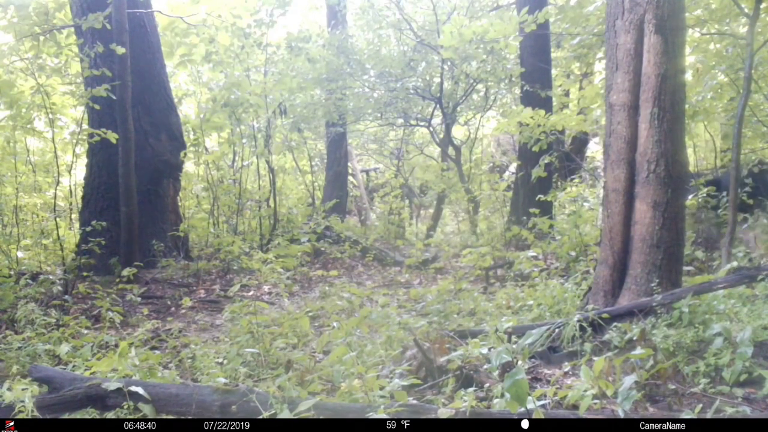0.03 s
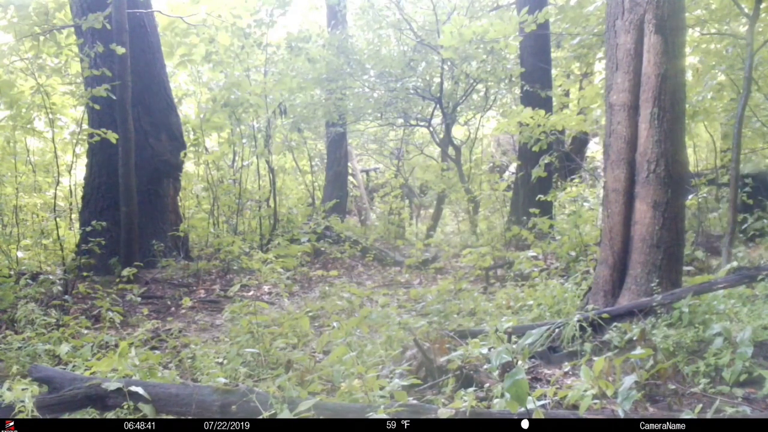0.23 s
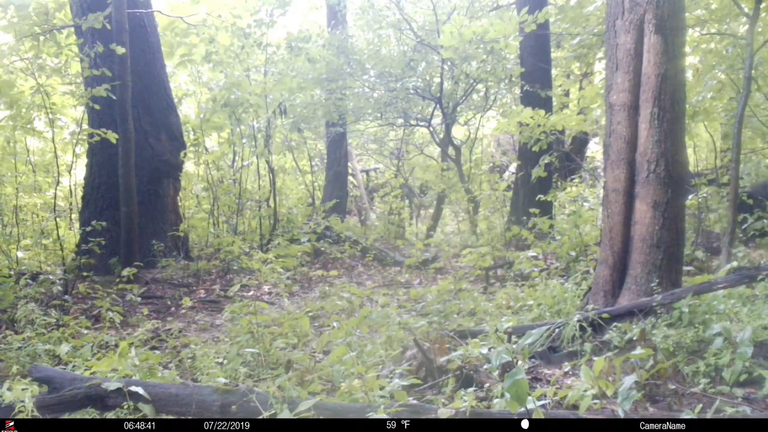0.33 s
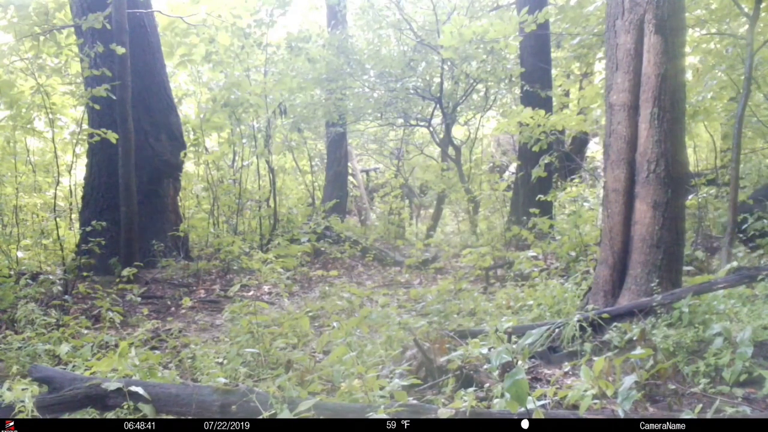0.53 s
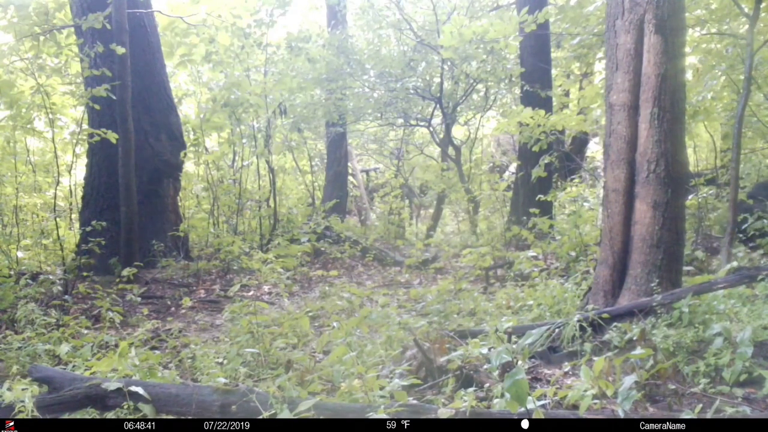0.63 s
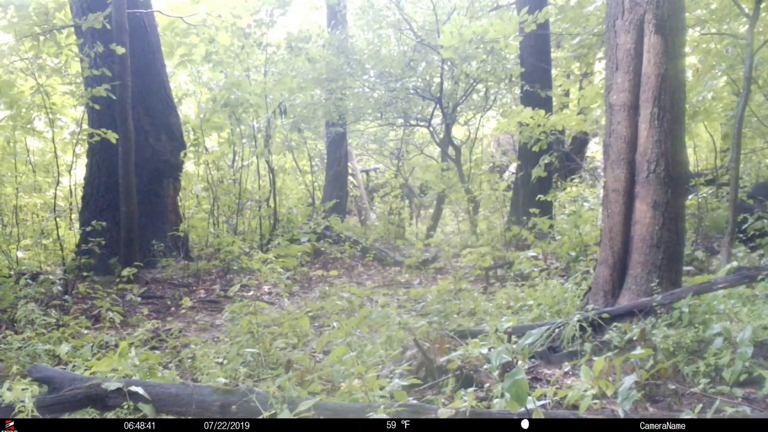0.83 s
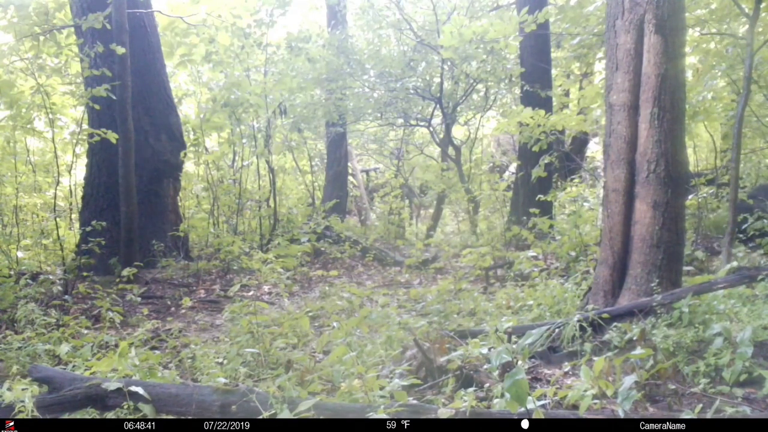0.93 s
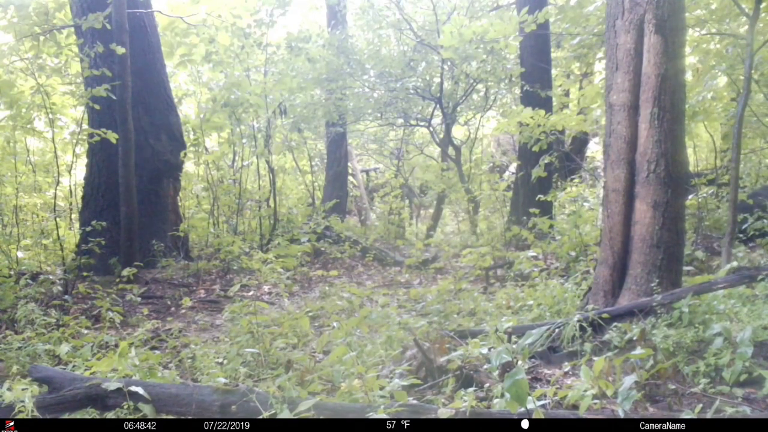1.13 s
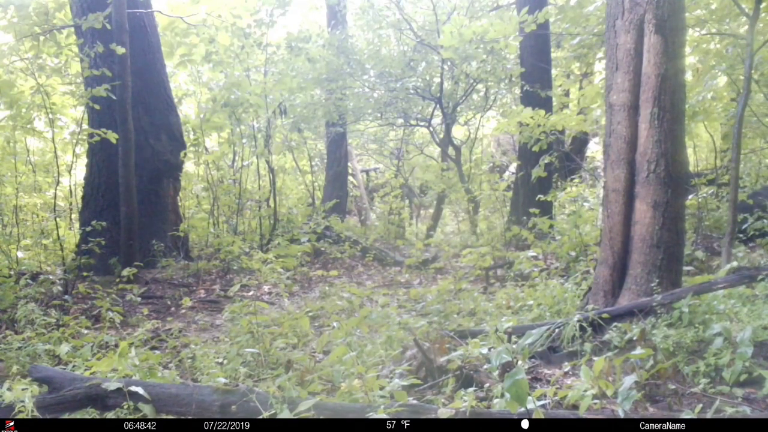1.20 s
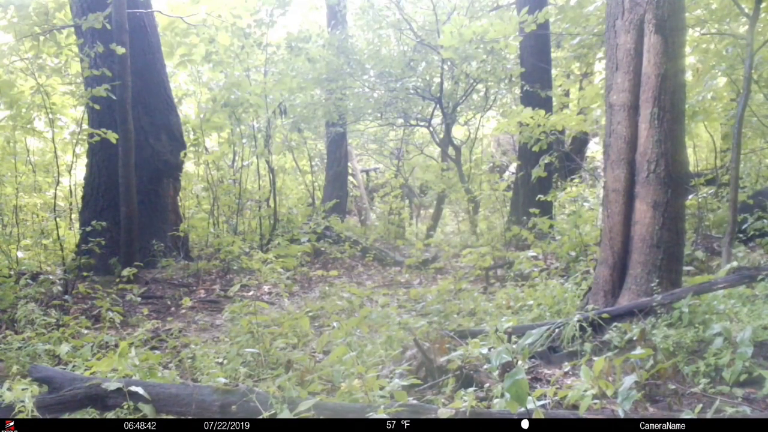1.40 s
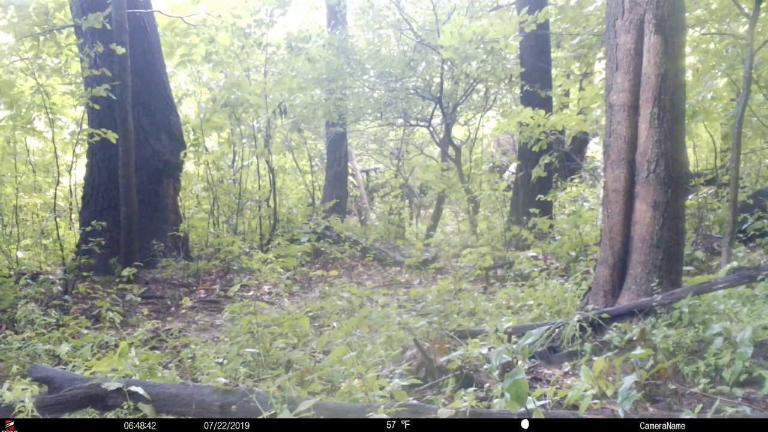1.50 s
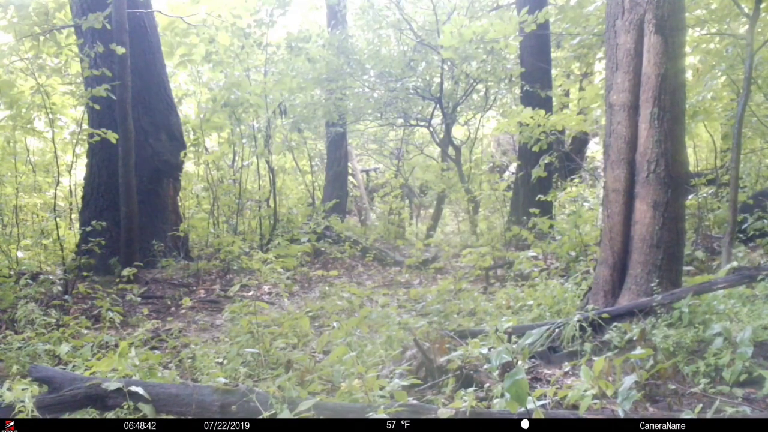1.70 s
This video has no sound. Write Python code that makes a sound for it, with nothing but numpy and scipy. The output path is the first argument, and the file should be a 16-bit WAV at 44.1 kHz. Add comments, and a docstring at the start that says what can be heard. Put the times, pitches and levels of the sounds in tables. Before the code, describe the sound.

A fawn gives one harsh, nasal distress wail in a quiet forest.

```python
"""One long distress wail from a fawn in a quiet wood: a clear nasal tone that cracks into a yelp, turns
harsh while it strains, then clears and sags. Vocal-fold harmonics shaped by the throat make the tone;
irregular fold beats and breath make the rasp; the trees echo it. Dry leaves rustle and twigs snap
over a low rumble and the hiss of a small microphone that rings in the treble."""
import sys
import numpy as np
from scipy import signal
from scipy.fft import rfft, irfft
from scipy.io import wavfile

SR = 44100
rng = np.random.default_rng(int(sys.argv[2]) if len(sys.argv) > 2 else 0)


def to_wav(s):
    """Save 16-bit WAV."""
    ch = np.atleast_2d(s).T  # columns
    pcm = np.round(np.clip(ch, -1, 1) * 32767)  # PCM
    wavfile.write(sys.argv[1], SR, pcm.astype(np.int16))


N = 77175
T = np.arange(N) / SR
FULL_STRAIN_DB = -40

# clear tone ahead of the throat: time_s, level_db
TONE_LEVEL = [(.185, -88), (.2, -49.5), (.22, -40), (.25, -35), (.275, -27), (.305, -37), (.34, -41.5),
              (.365, -45), (.39, -52.5), (.41, -38.5), (.47, -39.5), (.62, -39.5), (.7, -36.5), (.745, -29),
              (.81, -37), (.87, -33), (.95, -37), (.965, -41.5), (.995, -32.5), (1.08, -42.5), (1.11, -38),
              (1.135, -51), (1.16, -43.5), (1.18, -69)]
# body of the rasp: time_s, level_db
RASP_LEVEL = [(.19, -98), (.245, -67), (.28, -33), (.305, -45), (.335, -55), (.39, -91), (.42, -56),
              (.44, -42), (.5, -40.5), (.62, -41.5), (.69, -38), (.75, -44.5), (.9, -42.5), (.955, -47.5),
              (1.0, -60), (1.05, -93)]


def undb(db):
    """Decibels to gain."""
    return 10 ** (np.asarray(db) / 20)


def unit(x):
    """Scale to rms 1."""
    return x / np.sqrt(np.mean(x ** 2))


def curve(rows):
    """Join (time_s, value) rows by straight lines."""
    return np.interp(T, *np.array(rows).T)


def spectrum_db(hz, rows, column=1):
    """Read a dB column on a log-frequency axis."""
    rows = np.array(rows)
    return np.interp(np.log(hz + 1e-9), np.log(rows[:, 0]), rows[:, column])


def colour(x, rows):
    """Filter by (freq_hz, gain_db) rows; rms 1."""
    gain = undb(spectrum_db(np.fft.rfftfreq(N, 1 / SR), rows))
    return unit(irfft(rfft(x) * gain, N))


def walk(rate_hz):
    """Smooth random drift up to about rate_hz; rms 1."""
    lowpass = np.exp(-(np.fft.rfftfreq(N, 1 / SR) / rate_hz) ** 2)
    return unit(irfft(rfft(rng.standard_normal(N)) * lowpass, N))


def swell(centre_s, width_s):
    """Bell-shaped rise and fall."""
    return np.exp(-.5 * ((T - centre_s) / width_s) ** 2)


def ring(x, resonances):
    """Steep parallel resonances; rms 1."""
    out = 0
    for hz, width_hz, db in resonances:
        b, a = signal.iirpeak(hz, hz / width_hz, SR)
        out = out + undb(db) * signal.lfilter(b, a, signal.lfilter(b, a, x))
    return unit(out)


def microphone_hiss():
    """Faint, slowly falling hiss of a small microphone that rings in the treble."""
    # hiss spectrum: freq_hz, gain_db
    spectrum = [(150, 1.5), (400, -1), (1000, -2.5), (2000, -5), (3700, -5), (4400, -6), (4950, 3.5),
                (5450, -8), (6200, -4.5), (6700, -2.5), (7500, -9.5), (10000, -11.5), (13500, -10),
                (15000, -25)]
    start_db, fall_db_per_s = -63, 1
    level_db = start_db - fall_db_per_s * T + 0.17 * walk(45)
    return colour(rng.standard_normal(N), spectrum) * undb(level_db)


def rumble():
    """Low noise that swells unevenly and recedes."""
    # rumble spectrum: freq_hz, gain_db
    spectrum = [(10, -11), (28, -5.5), (50, -4.5), (75, -4), (120, -11), (200, -17), (400, -23.5),
                (1500, -49)]
    # rumble envelope: time_s, level_db
    level = [(0, -56.5), (.1, -57.5), (.18, -60.5), (.27, -55), (.34, -58), (.375, -50), (.44, -52.5),
             (.55, -59.5), (1.0, -64), (1.75, -65)]
    return colour(rng.standard_normal(N), spectrum) * undb(curve(level))


def leaves():
    """Dry leaves rustle in swells: a dull grainy ring and a crisp crackle."""
    # leaf rustles: centre_s, width_s, dull_db, crisp_db
    rustles = [(0.062, 0.016, -50, -59.5), (.088, 0.015, -54.5, -62), (.17, 0.26, -56.5, -62.5),
               (0.379, 0.011, -54.5, -59), (1.257, 0.01, -60.5, -67), (1.357, 0.0047, -59, -68),
               (1.543, .01, -63.5, -73)]
    # dull ring: freq_hz, gain_db
    dull_spectrum = [(150, -18), (900, -14.5), (2000, -14), (3000, -4), (3600, -15), (4500, 0), (5000, 6.5),
                     (5450, -11), (6100, -14), (6700, 0.5), (7400, -15.5), (15000, -36)]
    # crisp crackle: freq_hz, gain_db
    crisp_spectrum = [(6000, -6), (13500, -4), (15000, -23)]
    grains = rng.standard_normal(N) * undb(1.8 * walk(230))
    crackle = rng.standard_normal(N) * undb(2.6 * walk(400))
    dull = np.sqrt(sum((undb(db) * swell(at, width)) ** 2 for at, width, db, _ in rustles))
    crisp = np.sqrt(sum((undb(db) * swell(at, width)) ** 2 for at, width, _, db in rustles))
    return dull * colour(grains, dull_spectrum) + crisp * colour(crackle, crisp_spectrum)


def twigs(decay_s=0.0068):
    """Twigs snap: sudden, fast-decaying noise bursts."""
    # twig snaps: start_s, level_db
    snaps = [(0.03, -56), (1.328, -52)]
    # snap spectrum: freq_hz, gain_db
    spectrum = [(60, -1), (600, 0), (1100, -6), (2200, 1.5), (3000, -21), (9000, -34)]
    bursts = sum(undb(db) * (T >= at) * np.exp(-np.abs(T - at) / decay_s) for at, db in snaps)
    return bursts * colour(rng.standard_normal(N), spectrum)


def wood_echo(x, t60_s=0.59, build_s=0.03, band_hz=(845, 3140), gain_db=-10):
    """Trunks scatter a fading mid-range echo; two pitches linger, opposed in phase to the direct sound."""
    # lingering pitches: pitch_hz, t60_s, gain_db
    lingering = [(756, .35, -8), (1137, .85, -13)]
    tail = rng.standard_normal(N) * undb(-60 * T / t60_s) * (1 - np.exp(-T / build_s))
    band = signal.butter(2, band_hz, "band", fs=SR, output="sos")
    response = undb(gain_db) * signal.sosfilt(band, tail / np.sqrt(np.sum(tail ** 2)))
    for hz, linger_t60_s, db in lingering:
        fade = undb(-60 * T / linger_t60_s)
        response -= undb(db) * 2 * fade / np.sum(fade) * np.cos(2 * np.pi * hz * T)
    return signal.fftconvolve(x, response)[:N]


def rasp(cycles):
    """Uneven fold beats, rocked by a slower flutter, and a puff of breath each cycle ring the throat."""
    # body resonances: freq_hz, width_hz, gain_db
    body_modes = [(520, 285, -11), (1024.4, 158, 6.5), (1120, 135, -1.5), (1626, 100, 2), (2638, 295, 1.5),
                  (2870, 414, -4.5)]
    # treble resonances: freq_hz, width_hz, gain_db
    edge_modes = [(3106, 290, 0.5), (4580, 790, 7), (4958, 270, 12.5), (5480, 280, -1)]
    # treble envelope: time_s, level_db
    edge_level = [(.22, -69), (.255, -48), (.278, -38.5), (.3, -44), (.34, -52.5), (.405, -63), (.425, -45),
                  (.442, -38), (.48, -43.5), (.54, -47), (.69, -45.5), (.9, -48), (.955, -49), (1.0, -66.5),
                  (1.05, -65.5)]
    # voice cracks: centre_s, width_s, low_db, high_db
    cracks = [(0.282, 0.012, -43, -35.5), (0.458, 0.021, -41.5, -42), (.69, .012, -41, -52)]
    # low ring of a crack: freq_hz, width_hz, gain_db
    low_modes = [(966, 83, 0)]
    # high ring of a crack: freq_hz, width_hz, gain_db
    high_modes = [(1590, 220, 3.5), (2510, 290, 2.5), (4620, 380, -0.5)]
    beats = np.diff(np.floor(cycles), prepend=0)
    flutter_hz = 158 * (1 + 0.032 * walk(17))
    flutter = np.sqrt(2) * np.sin(2 * np.pi * np.cumsum(flutter_hz) / SR)
    steady = unit(beats)
    uneven = unit(beats * np.tanh(0.62 * flutter + 0.5 * walk(400)))
    breath = unit(rng.standard_normal(N) * (.5 + np.exp(-(cycles % 1))))
    source = uneven + 0.55 * breath
    body = undb(curve(RASP_LEVEL)) * ring(source, body_modes)
    edge = ring(steady + 2.2 * uneven + 1.4 * breath, edge_modes)
    edge *= undb(curve(edge_level) + 1.5 * walk(44))  # the treble flickers
    low, high = ring(source, low_modes), ring(source + steady, high_modes)
    yelps = sum(swell(at, width) * (undb(low_db) * low + undb(high_db) * high)
                for at, width, low_db, high_db in cracks)
    return body + edge + yelps


def clear_tone(cycles, pitch_hz, strain, shimmer=.3, shimmer_hz=45):
    """Fold harmonics, shaped by the throat as the mouth opens; strain makes the overtones tremble."""
    # mouth: time_s, opening (about 0 nearly shut, about 1 wide)
    mouth = [(.2, 0.52), (.25, 0.11), (.28, 0.067), (.34, 0.52), (.385, 1.03), (.41, 0.8), (.44, 1.34),
             (.52, 0.8), (.67, 1.23), (.75, 0.49), (.83, 0.77), (.87, 0.49), (.95, 0.78), (1.0, 0.078),
             (1.1, -0.35), (1.125, 0.76), (1.16, 0.42)]
    # throat response: freq_hz, nearly_shut_db, wide_db
    throat = [(560, -15, 3), (783, -21.5, -2.5), (1120, 5.5, -13), (1151, -8, 0), (1536, -20, -15.5),
              (2030, -33.5, -35), (2445, -22, -31.5), (2766, -15.5, -8), (3030, -25, -28), (3560, -39, -34),
              (4390, -29, -13.5), (4800, -28.5, -23.5), (5500, -35, -20), (5400, -23, -42),
              (6530, -41, -23), (8060, -61, -45)]
    # flaring throat resonances: centre_s, width_s, centre_hz, width_hz, lift_db
    flares = [(.215, 0.028, 2160, 220, 18), (0.269, 0.025, 1680, 150, 15.5), (.328, 0.039, 2620, 120, 12.5),
              (0.336, 0.019, 4900, 140, 20), (.6, 0.053, 2840, 90, 4), (.775, 0.027, 4400, 100, 7.5)]
    opening, tone_db = curve(mouth), curve(TONE_LEVEL)
    slack_db_per_khz = 4.6 * np.clip((T - 0.95) / 0.4, 0, 1)  # the folds go slack and the tone dulls
    fundamental_db = -55 + 0.63 * (tone_db - FULL_STRAIN_DB)  # only partly follows the loudness
    out = undb(fundamental_db) * np.cos(2 * np.pi * cycles)
    for k in range(2, 20):
        hz = k * pitch_hz
        db = (1 - opening) * spectrum_db(hz, throat) + opening * spectrum_db(hz, throat, column=2)
        for centre_s, width_s, centre_hz, width_hz, lift_db in flares:
            db += lift_db * swell(centre_s, width_s) * np.exp(-.5 * ((hz - centre_hz) / width_hz) ** 2)
        db -= slack_db_per_khz * np.maximum(hz / 1000 - 1, 0)
        tremble = 1 + shimmer * strain * (walk(shimmer_hz) + 1j * walk(shimmer_hz))
        overtone = np.exp(2j * np.pi * (k * cycles + rng.random()))
        out += undb(tone_db + db) * np.real(tremble * overtone)
    return np.sqrt(2) * out


def fawn(waver=.003, jitter_cycles=0.018, attack_s=0.011, release_s=0.016):
    """One cry; the harder the strain, the less evenly the folds beat."""
    # vocal-fold pitch: time_s, pitch_hz
    pitch = [(.19, 379), (.238, 382.7), (.274, 418), (.3, 389.3), (.366, 376.4), (.404, 383), (.44, 414.4),
             (.52, 400.4), (.58, 408.3), (.65, 405.4), (.69, 421.6), (.75, 399.4), (.904, 399.8),
             (1.0, 379.6), (1.122, 378.3), (1.165, 349)]
    pitch_hz = curve(pitch)
    strain = np.minimum(undb(curve(RASP_LEVEL) - FULL_STRAIN_DB), 1.2)
    cycles = np.cumsum(pitch_hz * (1 + waver * walk(40))) / SR
    cycles += jitter_cycles * strain * walk(83)
    start_s, end_s = TONE_LEVEL[0][0], TONE_LEVEL[-1][0]
    gate = np.clip((T - start_s) / attack_s, 0, 1) * np.clip((end_s - T) / release_s, 0, 1)
    return gate * (clear_tone(cycles, pitch_hz, strain) + rasp(cycles))


def scene():
    """The cry and its echo over leaves, twigs, hiss and rumble; mono."""
    cry = fawn()
    return (cry + wood_echo(cry) + leaves() + twigs() + microphone_hiss() + rumble())[None]


def record(dry):
    """A steep low-pass cuts the top."""
    cutoff_hz = 14900
    return signal.sosfilt(signal.ellip(10, .2, 70, cutoff_hz, fs=SR, output="sos"), dry)


dry = scene()
out = record(dry)
to_wav(out)
```